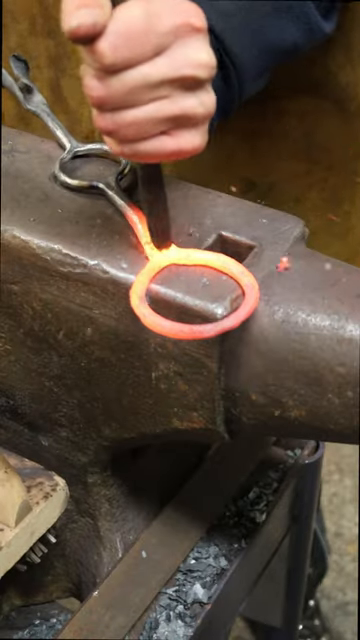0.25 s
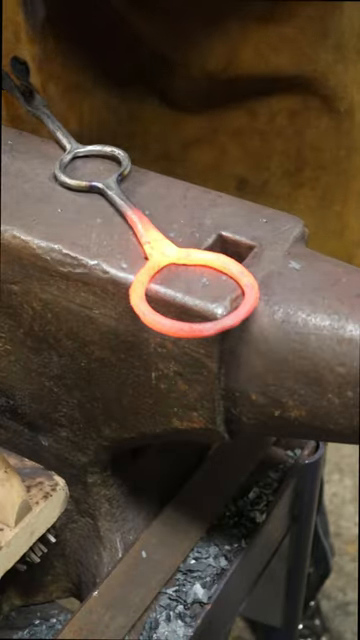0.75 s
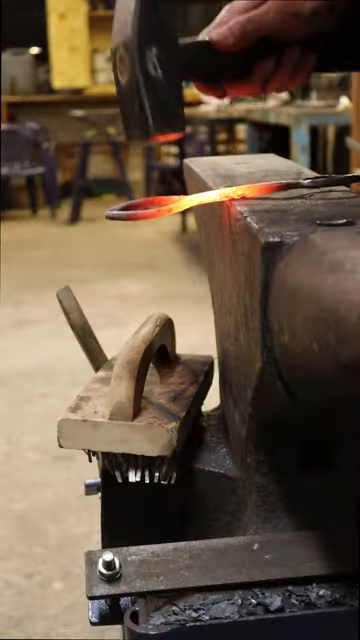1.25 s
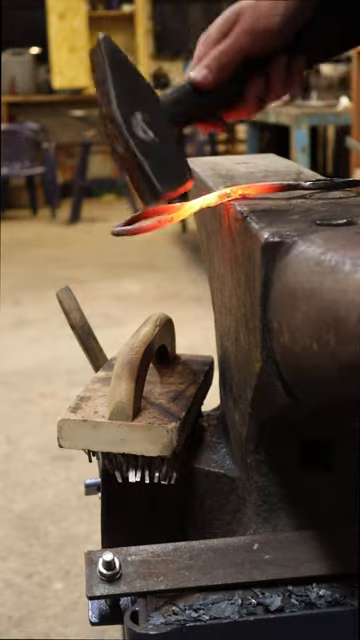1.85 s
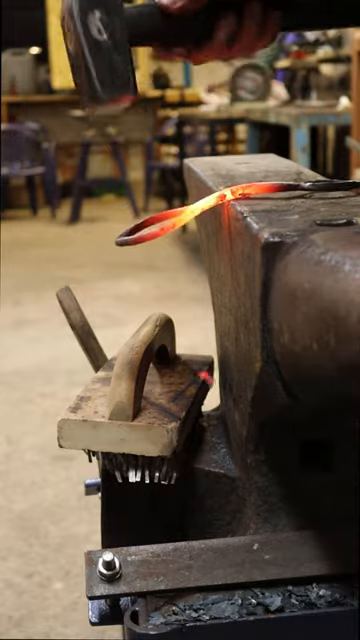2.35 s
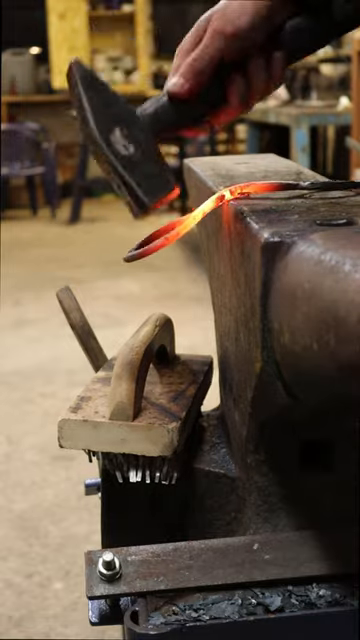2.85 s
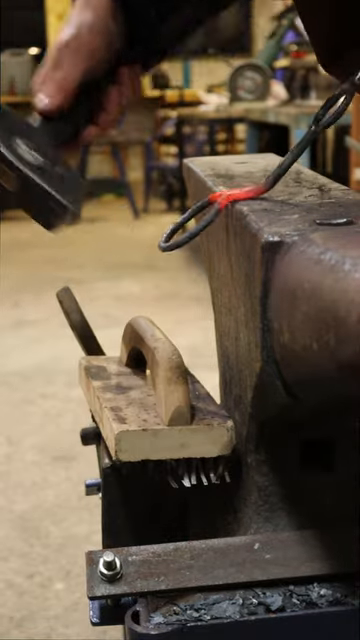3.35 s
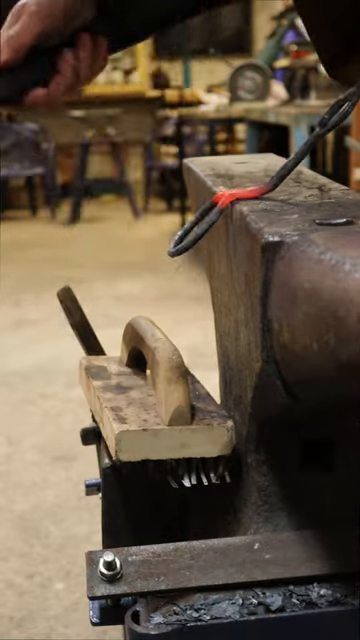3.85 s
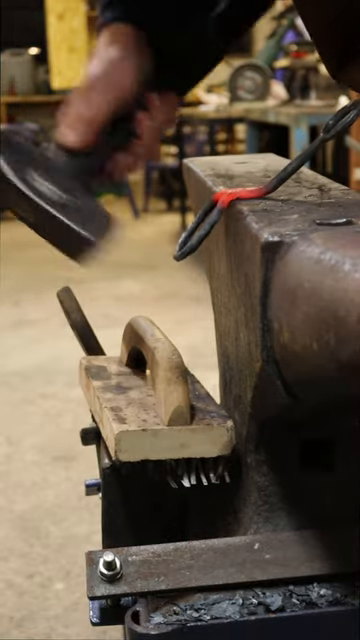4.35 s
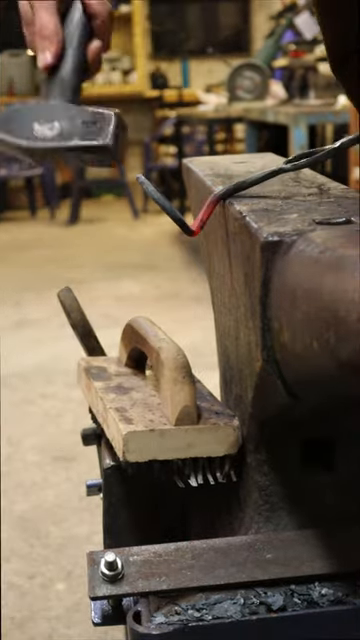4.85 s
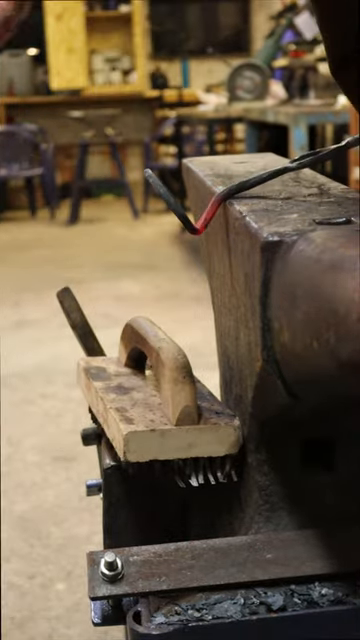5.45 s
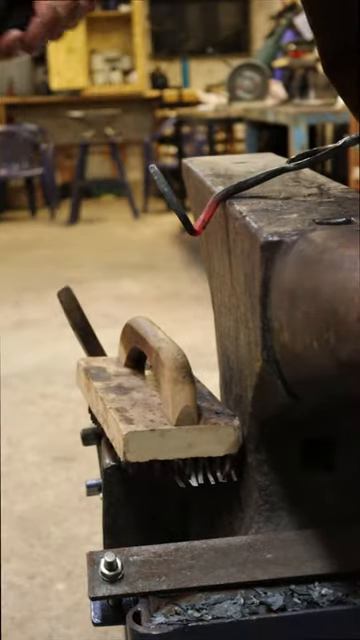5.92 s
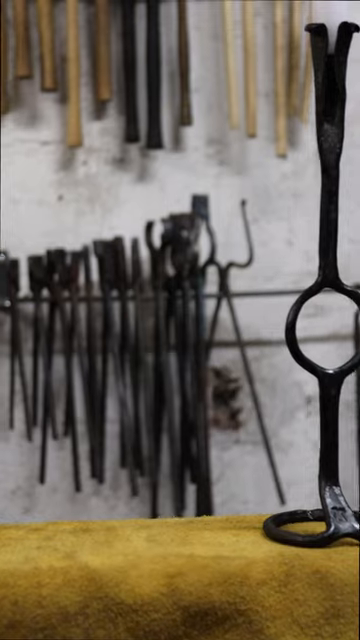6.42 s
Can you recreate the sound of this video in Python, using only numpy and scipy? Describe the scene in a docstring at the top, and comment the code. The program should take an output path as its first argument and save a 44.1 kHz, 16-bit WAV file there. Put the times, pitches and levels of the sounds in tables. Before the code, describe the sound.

Close, overloaded hammering on hot iron over an anvil: one heavy chisel strike, dull thuds turning to sharp cracks, ending in quiet room noise.

```python
"""In a reverberant workshop, a smith works a hot iron loop on a steel anvil: one chisel cut, then a run of
hammer blows that bend it over the edge. Bright noise bursts make the cracks, and decaying sines ring the iron,
the anvil and its stand. Small taps, falling scale and steady room noise fill the gaps; a soft knock ends it.
Four times the tails of the blows stop short. The close microphone overloads: its gain control ducks the
loudest moments and lets the tails swell back, and what slips past is clipped."""
import sys
import numpy as np
from scipy import signal
from scipy.fft import rfft, irfft, next_fast_len
from scipy.io import wavfile
from scipy.ndimage import uniform_filter1d

SR = 44100
rng = np.random.default_rng(int(sys.argv[2]) if len(sys.argv) > 2 else 0)


def transcribe(u):
    """Save the signal u as a 16-bit wav file named by the first command-line argument.

    u: samples, shape (n,) or (channels, n), limited to [-1, 1]; the rate is SR.
    q: integer samples, one column per channel.
    """
    v = np.clip(np.atleast_2d(u).T, -1, 1)
    q = np.round(v * 32767).astype(np.int16)
    wavfile.write(sys.argv[1], SR, q)


N = 294588
TIME = np.arange(N) / SR  # s
AGE = np.arange(SR) / SR  # time since a sound began, s


def amp(db):
    """Decibels to gain."""
    return 10 ** (np.asarray(db) / 20)


def unit(x):
    """Scale to rms 1."""
    return x / np.sqrt(np.mean(x ** 2) + 1e-20)


def along(points, hz):
    """Read (Hz, value) points on a log frequency axis."""
    f, values = np.transpose(points)
    return np.interp(np.log(hz + 1), np.log(f), values)


def fade(t60, t=AGE):
    """Exponential decay that falls 60 dB in t60 seconds."""
    return np.exp(-np.log(1000) * t / t60)


def add(track, s, x):
    """Mix x into the track from time s."""
    part = track[:, round(s * SR):][:, :x.shape[-1]]
    part += x[..., :part.shape[1]]


def noise(spectrum, alike, size, tilt_db=0):
    """Coloured stereo noise of rms 1; mid and side are weighted for the left-right likeness."""
    m = next_fast_len(size)
    hz = np.fft.rfftfreq(m, 1 / SR)
    turn = np.arccos(np.clip(along(alike, hz), -1, 1)) / 2
    colour = amp(along(spectrum, hz) + tilt_db * np.log2(1 + hz / 1000))
    white = rfft(rng.standard_normal((2, m)))
    mid, side = irfft(white * colour * [np.cos(turn), np.sin(turn)], m)[:, :size]
    return unit(np.array([mid + side, mid - side]))


def ring(modes, scatter_db, spread, detune=0.0):
    """Damped modes at fresh strengths; each reaches the two channels a little out of phase."""
    out = np.zeros((2, SR))
    for hz, db, t60 in modes:
        t = AGE[:int(2 * t60 * SR)]
        phase = rng.uniform(0, 2 * np.pi) + spread * rng.standard_normal((2, 1))
        pitch = hz * (1 + detune * rng.standard_normal())
        strength = amp(db + scatter_db * rng.standard_normal())
        out[:, :len(t)] += strength * fade(t60, t) * np.sin(2 * np.pi * pitch * t + phase)
    return out


# how long the room rings: f/Hz, t60/s
ROOM_DECAY = [(100, 0.81), (500, 0.72), (1500, 0.63), (3200, 0.56), (6000, 0.44), (10000, 0.33),
              (15000, 0.27)]
# tone of the reverberant tail: f/Hz, relative level/dB
ROOM_COLOUR = [(60, -16.5), (200, 7.5), (500, -5.5), (900, -1), (1400, -0.5), (3000, 0), (6000, 1.5),
               (8000, -3), (11000, -3.5), (15000, -5.5)]
# diffuse sound: f/Hz, left-right likeness (0 to 1)
DIFFUSE_LIKENESS = [(100, 0.98), (250, 0.95), (600, 0.77), (1500, 0.047), (10000, 0)]


def workshop(tilt_db=0, early_db=-4, early_t60=0.063, delay=0.0042, pan_db=0.48):
    """The room's response: near surfaces over a tail of energy 1 whose treble dies soonest."""
    wash = noise(ROOM_COLOUR, DIFFUSE_LIKENESS, size=SR, tilt_db=tilt_db)
    hz, t, bands = signal.stft(wash, SR, nperseg=256)
    decayed = bands * fade(along(ROOM_DECAY, hz)[:, None], t)
    tail = signal.istft(decayed, SR, nperseg=256)[1][:, :SR]
    early = noise(CRACK_COLOUR, DIFFUSE_LIKENESS, size=SR, tilt_db=tilt_db) * fade(early_t60)
    arrival = np.clip(AGE / delay - 1, 0, 1)  # silent for one delay, then ramps up over another
    both = unit(tail * arrival) + amp(early_db) * unit(early * arrival)
    return both * amp([[-pan_db], [pan_db]]) / np.sqrt(SR)


def echo(x):
    """A sound as the room returns it, fed from the left channel."""
    return signal.fftconvolve(x[:1], workshop(), axes=1)[:, :x.shape[1]]


# moments when tails stop short; the room noise also alters at the first and last: t/s
CUTS = [1.008, 3.071, 4.674, 6.376]


def until_cut(s, x, fall=0.0069):
    """Stop a sound that starts at s with a short ramp at the next cut."""
    end = min(cut for cut in CUTS if cut > s)
    return x * np.clip((end - s - AGE) / fall + .5, 0, 1)


# room noise at the forge: f/Hz, relative level/dB
FORGE_AIR = [(15, -52), (25, -16.5), (70, -14.5), (82, -13.5), (102, -1.5), (120, -9.5), (775, -15.5),
             (1330, -19), (8360, -30), (9840, -34), (11900, -29), (16000, -34.5)]
# room noise by the tool rack: f/Hz, relative level/dB
RACK_AIR = [(15, -45.5), (25, -9.5), (157, -4), (223, 0.5), (394, -8), (463, -10), (560, -9), (734, -10.5),
            (887, -5), (2550, -21.5), (12500, -32.5), (14000, -21), (16000, -43.5)]


def air(chisel_db=-53, forge_db=-51, rack_db=-51):
    """Steady room noise at each place: over the chisel, beside the anvil, by the tool rack."""
    level_db = np.where(TIME < CUTS[0], chisel_db, forge_db)
    forge = amp(level_db) * noise(FORGE_AIR, DIFFUSE_LIKENESS, size=N)
    rack = amp(rack_db) * noise(RACK_AIR, DIFFUSE_LIKENESS, size=N)
    return np.where(TIME < CUTS[-1], forge, rack)


# broadband colour of a hard contact: f/Hz, relative level/dB
CRACK_COLOUR = [(40, -28.5), (300, -7), (900, 2), (2300, -0.5), (4500, 3), (8000, -3.5), (11000, -3.5),
                (14500, -6.5), (17000, -6)]


def crack(tilt_db, body_t60=0.031, edge_t60=0.0026, body_db=-5.5, edge_db=3):
    """The contact itself: a very short noise edge on a longer noise body."""
    alike = [(300, 0.53), (3000, 0.25), (12000, 0.053)]  # f/Hz, left-right likeness
    body = noise(CRACK_COLOUR, alike, size=SR, tilt_db=tilt_db + 0.5) * fade(body_t60)
    edge = noise(CRACK_COLOUR, alike, size=SR, tilt_db=tilt_db - 0.5) * fade(edge_t60)
    return amp(body_db) * body + amp(edge_db) * edge


# modes of the stand under the anvil: f/Hz, relative level/dB, t60/s
STAND_MODES = [(69.1, -2, 0.91), (128, -2.5, 1), (158, -1.5, 1), (189, 0, 0.78), (216.7, -5.5, 0.85),
               (261.4, -1, 0.5), (308.7, -6, 0.27)]


def stand(pitch_hz, focus_db=22):
    """The heavy anvil rocks its stand; modes lose focus_db per octave away from the blow's pitch."""
    modes = [(hz, db - focus_db * abs(np.log2(hz / pitch_hz)), t60) for hz, db, t60 in STAND_MODES]
    return ring(modes, scatter_db=1.5, spread=.12)


# iron and tool ring differently for each stroke: f/Hz, relative level/dB, t60/s
IRON_MODES = {"chisel": [(260, -17, 0.02), (3080, -3.5, 0.0057), (4300, -17, 0.0097), (5980, -7, .007),
              (458, -47, 1.1), (531, -44, 1.3), (765, -41, 1.4), (3876, -34, .3), (5206, -35, .45),
              (10090, -14, .07)], "dull": [(740, -10.5, 0.022), (1400, -15, 0.05), (1650, -1, 0.0091),
              (2260, -6.5, 0.011), (2890, -1.5, 0.0069), (4400, -21, 0.033), (2560, -19, .14),
              (2780, -23, .1), (3472, -20, .12), (3781, -19, .15), (9162, -27, .05)],
              "flat": [(451, -20, 0.015), (839, -13, 0.023), (1310, -6, 0.0099), (1657, -10, 0.013),
              (2830, -6, 0.009), (3600, -8, 0.0072), (3940, -4, 0.012), (4670, -7.5, 0.0057),
              (5560, -13.5, 0.015)], "edge": [(486, -11, 0.011), (800, -10.5, 0.016), (1455, -8.5, 0.034),
              (1647, -5.5, 0.013), (2850, -12, 0.026), (3530, -9, .012), (3940, -12, .014),
              (5490, -4.5, 0.012)], "bend": [(1600, -14.5, 0.024), (1760, -7.5, 0.005), (2650, -1, 0.0029),
              (4364, -7.5, 0.021), (4385, -7, 0.011), (6160, -12.5, 0.011), (10620, -7, 0.013)],
              "upset": [(1710, -9, 0.023), (1860, -7.5, 0.027), (1944, -7.5, 0.025), (2090, -3.5, 0.0091),
              (3220, -22.5, 0.0083), (4150, -9.5, 0.015), (5300, -20, 0.022), (9060, -1, 0.0034),
              (16100, -12, 0.015)]}
# the anvil's long modes: f/Hz, relative level/dB, t60/s
ANVIL_MODES = [(862, -9, .7), (1238, -8, .6), (1297, -2, .7), (1369, -4, .6), (1888, -2, .5),
               (2561, -4, .65), (3470, -2, .6), (4053, -3, .5), (5206, -5, .55), (6083, -8, .5),
               (8280, -8, .55), (8583, -9, .45), (10085, -2, .36)]
# floor and walls answer the stand: f/Hz, relative level/dB
BOOM_COLOUR = [(25, -42.5), (65, -0.5), (110, 0), (170, 5), (250, -0.5), (330, -7.5), (500, -11.5),
               (700, -17), (1500, -54)]
# shared by all blows of one stroke: stand pitch f/Hz, floor boom level/dB, room level/dB
STROKES = {"chisel": (142, -11.5, -3), "dull": (160, -25, -3), "flat": (197, -18, -5),
           "edge": (192, -17.5, -6.5), "bend": (160, -28.5, -9.5), "upset": (160, -17, -10.5)}
# names of the strokes that leave the loop free to buzz over the anvil's edge
OVERHANGING = ("edge", "bend", "upset")
CHATTER_DB = -40.5  # level of that buzz
BOOM_FOLLOWS = 0.32  # dB of floor boom per dB of thump


def blow(stroke, ring_db, crack_db, tilt_db, thump_db,
         wash_db=15, anvil_db=-43, boom_t60=0.68, rise=0.003, pan_db=2.0):
    """Steel meets iron: a crack, the damped ring of the work, the anvil's tones and the stand's thump."""
    pitch_hz, boom_db, room_db = STROKES[stroke]
    iron = amp(ring_db) * ring(IRON_MODES[stroke], scatter_db=.8, spread=.6, detune=.001)
    # the anvil's level follows that of the work
    anvil = amp(ring_db + anvil_db) * ring(ANVIL_MODES, scatter_db=3, spread=1.0)
    direct = (amp(crack_db) * crack(tilt_db) + iron + anvil) * amp([[-pan_db], [pan_db]])
    # the broadband crack excites the whole room response
    room = echo(iron) + amp(wash_db + crack_db) * workshop(tilt_db)
    boom_level = amp(boom_db + BOOM_FOLLOWS * thump_db)
    boom = boom_level * noise(BOOM_COLOUR, DIFFUSE_LIKENESS, size=SR) * fade(boom_t60)
    slow_start = 1 - np.exp(-AGE / rise)  # the heavy mass is slow to move
    thump = (amp(thump_db) * stand(pitch_hz) + boom) * slow_start
    buzz = amp(CHATTER_DB) * chatter() if stroke in OVERHANGING else 0
    return direct + amp(room_db) * room + thump + buzz


# a hard contact on cooler metal cracks louder and brighter; a square one thumps the stand:
# t/s, stroke, ring level/dB, crack level/dB, crack tilt/dB per octave (in the treble), thump level/dB
BLOWS = [(0.2105, "chisel", 19, 18.5, 0.5, -6.5), (0.9422, "dull", -1, -12.5, -16.5, -26.5),
         (1.1878, "flat", -2.5, -8.5, -3.5, -40), (1.521, "flat", -4, -2, -0.5, -27.5),
         (1.858, "flat", -4, -1, 1, -28), (2.202, "flat", -3, 0, 6, -22),
         (2.5409, "edge", -3.5, -2.5, -2, -14.5), (2.8397, "edge", -3, -1, 0.5, -17.5),
         (3.2799, "bend", 4, 7.5, 5, -33.5), (3.6781, "bend", 6.5, 10.5, 7.5, -29.5),
         (4.0763, "bend", 4.5, 10.5, 5.5, -27.5), (4.4695, "bend", 7.5, 7, 4, -32),
         (4.8779, "upset", 7.5, 12.5, 4, -18), (5.3155, "upset", 7.5, 9.5, 4, -25),
         (5.7375, "upset", 7, 13, 6, -21), (6.082, "upset", 2.5, 7.5, 6, -27)]
# entries partway down the tail of a blow like the next one: t/s, age of that blow t/s, level/dB
TAIL_ENTRIES = [(3.069, 0.22, 1.5), (4.673, .24, 2)]


def hammer():
    """The chisel cut and the run of hammer blows, with two tails entered partway."""
    out = np.zeros((2, N))
    for s, *how in BLOWS:
        add(out, s, until_cut(s, blow(*how)))
    for s, age, db in TAIL_ENTRIES:
        next_how = next(how for start, *how in BLOWS if start > s)
        add(out, s, amp(db) * blow(*next_how)[:, round(age * SR):])
    return out


def chisel_push(db=24, width=0.001):
    """The chisel breaks through and bottoms on the anvil: one low pressure pulse."""
    out = np.zeros((2, N))
    pulse = (1 - AGE / width) * np.exp(-AGE / width)
    add(out, BLOWS[0][0], -amp(db) * pulse)
    return out


def chisel_after(rumble_db=-16, rumble_t60=0.75, sing_db=-30, rise=0.023):
    """The stand drops back with a rumble; lifted out of the cut, the chisel rings freely."""
    out = np.zeros((2, N))
    swell = 1 - np.exp(-AGE / rise)
    rumble = noise(BOOM_COLOUR, DIFFUSE_LIKENESS, size=SR) * fade(rumble_t60) * swell
    note = ring([(3876, 0, .6)], scatter_db=0, spread=.4)  # f/Hz, level/dB, t60/s
    add(out, .36, until_cut(.36, amp(rumble_db) * rumble))
    add(out, .48, until_cut(.48, amp(sing_db) * note * swell))
    return out


# the iron taps the anvil and flakes of scale fall: t/s, relative level/dB, relative treble level/dB
TICKS = [(0.607, -35, 0), (0.623, -37, 0), (0.766, -32, -8), (3.559, -26, -8), (4.728, -30, -18),
         (4.779, -24, -26), (5.202, -27, -24)]
# the iron against the anvil: f/Hz, relative level/dB, t60/s
RATTLE_MODES = [(1450, 3.5, 0.022), (1563, 4, 0.014), (2940, 7.5, 0.0073), (3283, -1, 0.013)]
# a soft knock near the tool rack: f/Hz, relative level/dB, t60/s
KNOCK_MODES = [(539, 6, 0.041), (940, 4, 0.035), (1260, 6, 0.022), (2340, -6, 0.022)]


def small_contacts(tick_db=-5, fizz_db=-5, body_db=-6, room_db=-3, knock_db=-44):
    """Taps between blows pair a noise snap with iron modes; a softly rising knock comes at the end."""
    out = np.zeros((2, N))
    for s, db, treble_db in TICKS:
        snap = amp(fizz_db + treble_db) * rng.standard_normal((2, SR)) * fade(0.025)
        body = amp(body_db) * ring(RATTLE_MODES, scatter_db=2, spread=.5, detune=.03)
        tick = amp(db + tick_db) * (snap + body)
        add(out, s, tick + amp(room_db) * echo(tick))
    soft_start = 1 - fade(.01)
    knock = amp(knock_db) * ring(KNOCK_MODES, scatter_db=1, spread=.4) * soft_start
    add(out, 6.483, knock + amp(room_db) * echo(knock))
    return out


def scale_flakes(start=0.73, per_s=30, db=-47, scatter_db=4, t60=0.036, tilt_db=2):
    """Scale loosened by the chisel patters onto the anvil: noise ticks at random times and levels."""
    levels = amp(db + scatter_db * rng.standard_normal(SR))
    falls = (rng.random(SR) < per_s / SR) * levels
    tick = noise(CRACK_COLOUR, DIFFUSE_LIKENESS, size=SR, tilt_db=tilt_db) * fade(t60)
    patter = signal.fftconvolve(falls[None], tick, axes=1)[:, :SR]
    out = np.zeros((2, N))
    add(out, start, until_cut(start, patter))
    return out


def chatter(per_s=70, t60=2.32, scatter_db=4, swing_hz=19, swing_db=4):
    """The loosely held iron keeps buzzing against the anvil's edge, hardest once in each swing."""
    swing = swing_db * np.sin(2 * np.pi * (swing_hz * AGE + rng.random()))
    levels = amp(scatter_db * rng.standard_normal(SR) + swing)
    touches = (rng.random(SR) < per_s / SR) * levels
    contact = ring(RATTLE_MODES, scatter_db=1, spread=.7, detune=.02)
    buzz = signal.fftconvolve(touches[None], contact, axes=1)[:, :SR]
    return unit(buzz + echo(buzz)) * fade(t60)


# the iron springs back and slaps the anvil once more: t/s, level/dB
REBOUNDS = [(2.558, -17.5), (2.856, -15), (3.687, -13), (4.893, -5.5), (5.748, -3.5), (6.089, -10),
            (6.100, -12)]
# colour of the slap: f/Hz, relative level/dB
SLAP_COLOUR = [(300, -14), (900, -13.5), (1600, 8.5), (2500, 0), (3400, 3.5), (4200, 1), (6000, -3),
               (15000, -18.5)]


def rebounds(t60=0.052, room_db=-9):
    """A rough noise burst, the second contact, some 7 to 18 ms behind certain blows."""
    out = np.zeros((2, N))
    for s, db in REBOUNDS:
        slap = amp(db) * noise(SLAP_COLOUR, DIFFUSE_LIKENESS, size=SR) * fade(t60)
        add(out, s, until_cut(s, slap + amp(room_db) * echo(slap)))
    return out


def scene():
    """Everything that reaches the microphone."""
    cutting = chisel_push() + chisel_after() + scale_flakes()
    return air() + hammer() + cutting + small_contacts() + rebounds()


def gain_control(x, threshold_db=-3, release_db_per_s=82, attack=0.0012):
    """Loud peaks pull the gain down in about a millisecond; it climbs back at a steady rate."""
    power = uniform_filter1d(np.mean(x ** 2, 0), size=64)
    over_db = np.maximum(10 * np.log10(np.abs(power) + 1e-12) - threshold_db, 0)
    # each peak is held, less the steady release since
    released_db = release_db_per_s * TIME
    held_db = np.maximum.accumulate(over_db + released_db) - released_db
    pole = np.exp(-1 / (attack * SR))
    return x * amp(-signal.lfilter([1 - pole], [1, -pole], held_db))


def record(dry, top_hz=16000):
    """Gain control, clipping of what slips past it, and a steep band limit."""
    clipped = np.clip(gain_control(dry), -.9, .9)
    m = next_fast_len(N + SR // 2)
    band = 1 / (1 + (np.fft.rfftfreq(m, 1 / SR) / top_hz) ** 100)
    return irfft(rfft(clipped, m) * band, m)[:, :N]


dry = scene()
out = record(dry)
transcribe(out)
```